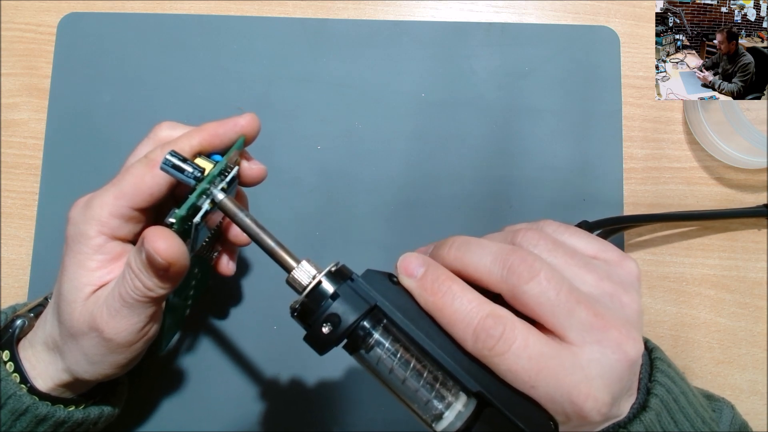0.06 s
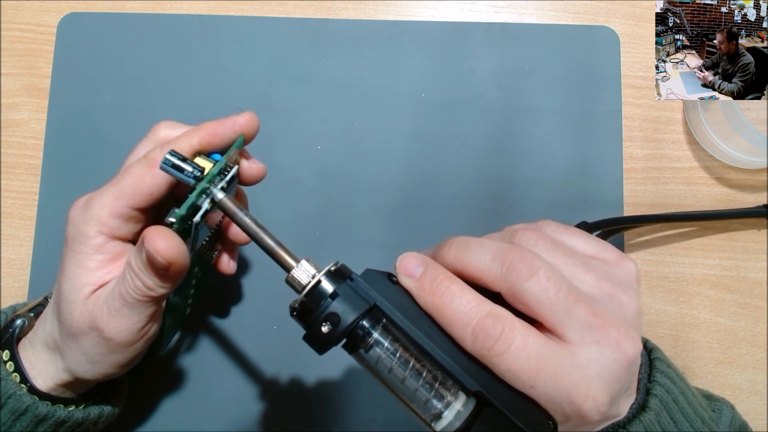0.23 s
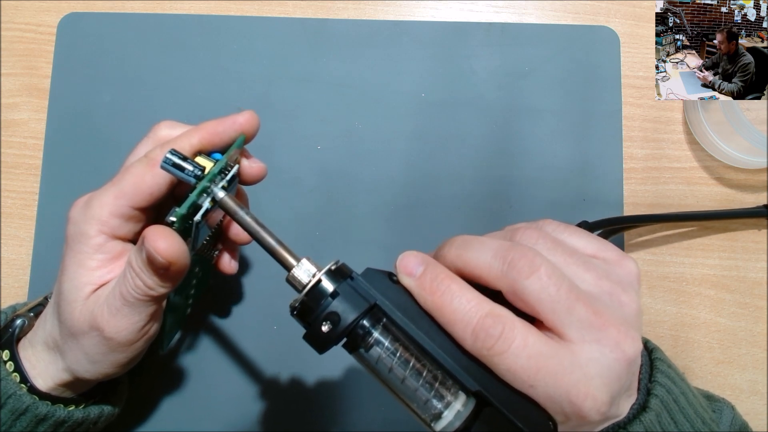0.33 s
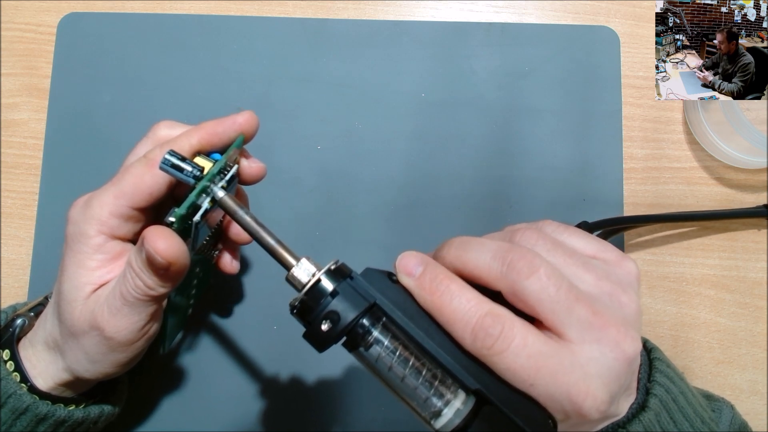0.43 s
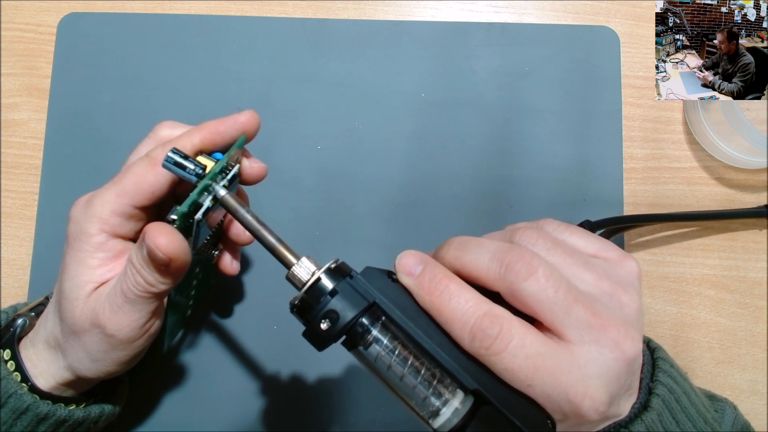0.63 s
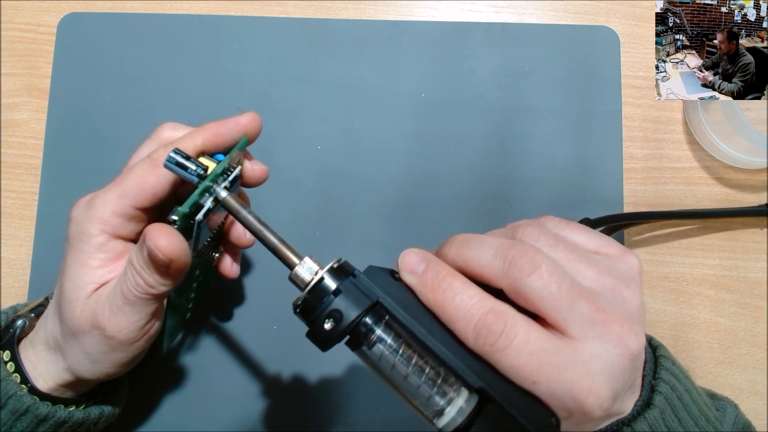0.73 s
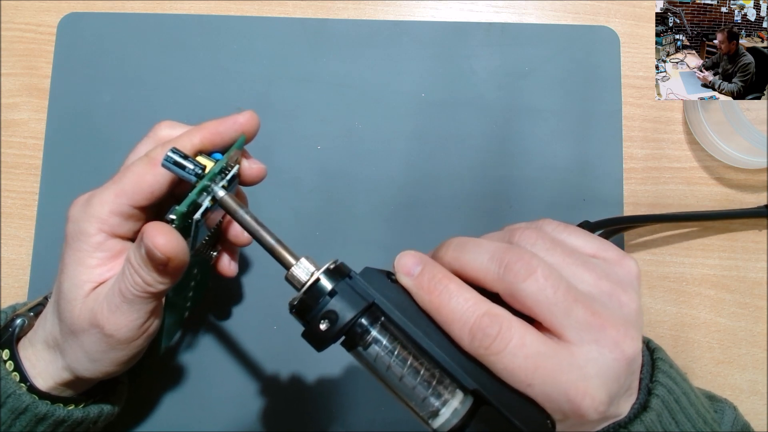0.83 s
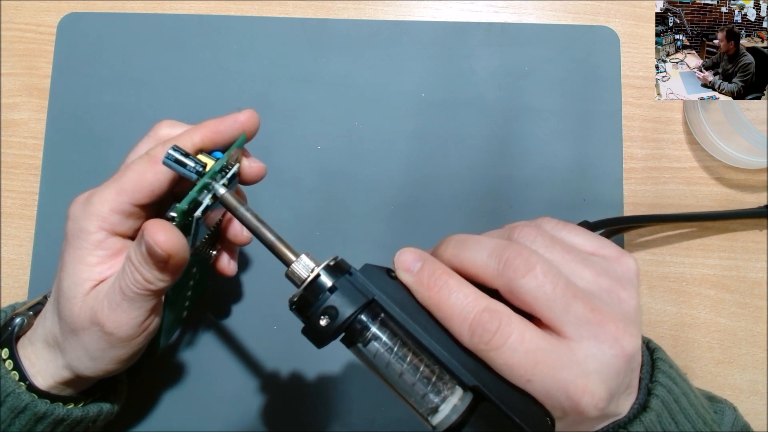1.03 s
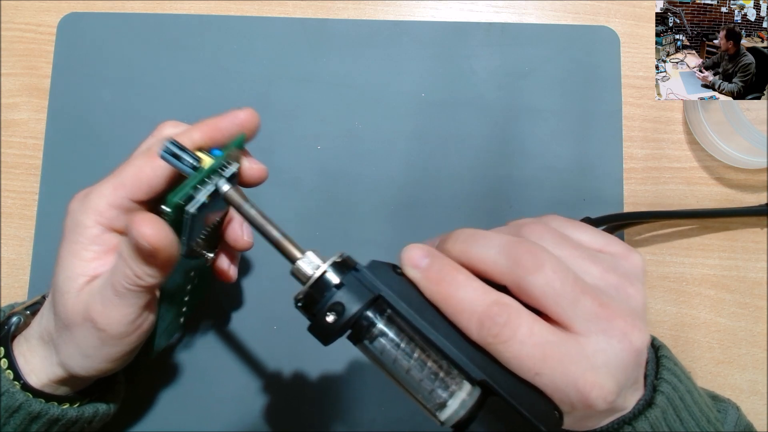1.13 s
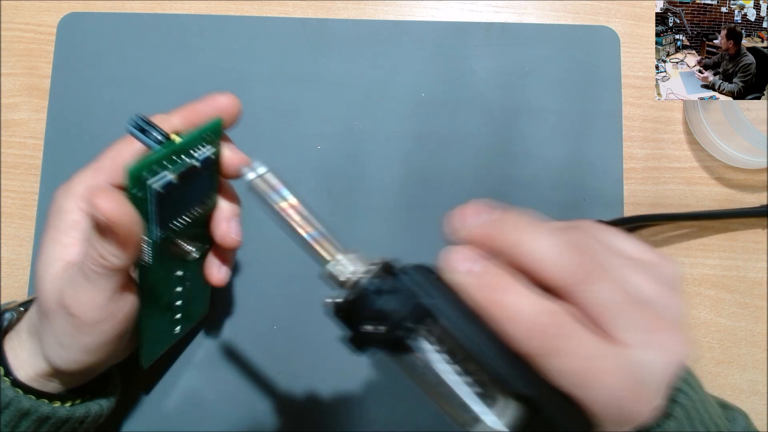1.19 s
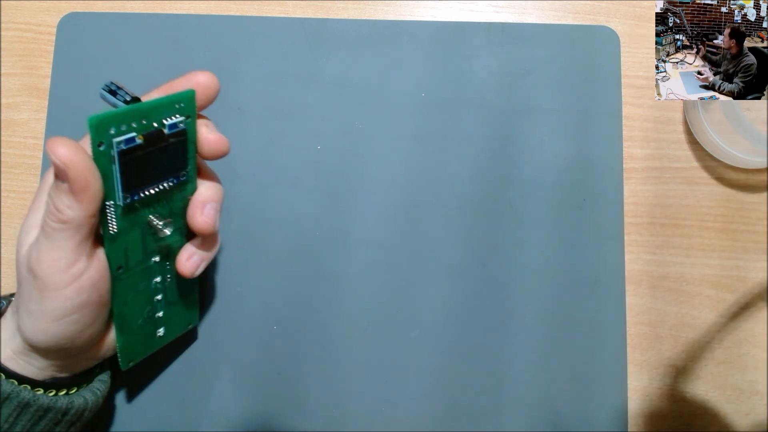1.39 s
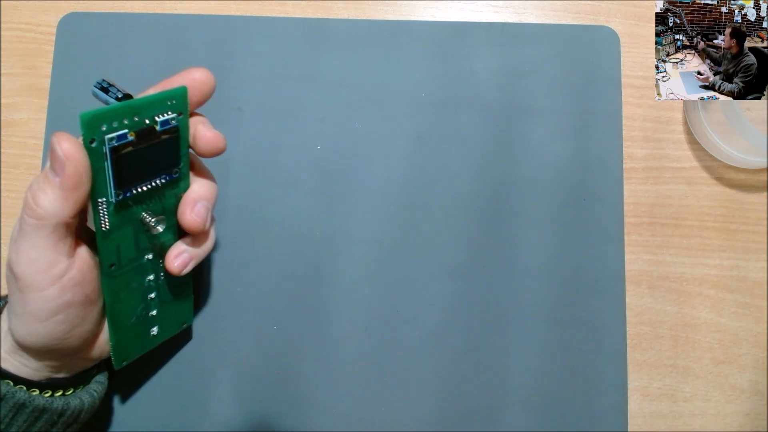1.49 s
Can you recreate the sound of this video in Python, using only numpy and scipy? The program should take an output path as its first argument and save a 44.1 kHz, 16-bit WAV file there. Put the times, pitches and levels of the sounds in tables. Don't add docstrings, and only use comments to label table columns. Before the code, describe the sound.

A hand-held desoldering gun at a workbench: trigger click, electric pump spins up quickly into a steady low buzz with faint air hiss, then a sharp trigger snap and falling motor, close mono microphone.

```python
import sys
import numpy as np
from scipy import signal
from scipy.fft import rfft, irfft, next_fast_len
from scipy.io import wavfile
from scipy.ndimage import uniform_filter1d

SR = 44100
rng = np.random.default_rng(int(sys.argv[2]) if len(sys.argv) > 2 else 0)


def transcribe(signal):
    frames = np.atleast_2d(signal).T
    limited = np.clip(frames, -1, 1)
    pcm = np.round(limited * 32767).astype(np.int16)
    wavfile.write(sys.argv[1], SR, pcm)


def rack_gain(trim_db):
    fader = np.asarray(trim_db, float)
    return 10 ** (fader / 20)


N = 68355
TIME = np.arange(N) / SR
FULL_HZ = 89

# start_s, ring_db, crack_db
PRESS_SNAPS = [
    (.2212, -8, -21),
    (.2236, -12, -23),
    (.2262, -13.5, -44),
    (.2295, -19, -46),
]


def evened(x):
    return x / np.sqrt(np.mean(x ** 2) + 1e-20)


def slow(size):
    once = uniform_filter1d(rng.standard_normal(N), size)
    return evened(uniform_filter1d(once, size))


def noise(colour, patch_db):
    frames, hz = N // 128 + 5, np.fft.rfftfreq(512, 1 / SR)
    real, imag, patch = rng.standard_normal((frames, 257, 3)).T
    patch = uniform_filter1d(uniform_filter1d(patch, size=6, axis=0), size=14, axis=1)
    colour_hz, colour_db = np.transpose(colour)
    level_db = np.interp(np.log(hz + 1), np.log(colour_hz + 1), colour_db)
    z = (real + 1j * imag) * rack_gain(level_db[:, None] + patch_db * evened(patch))
    return evened(signal.istft(z, nperseg=512, noverlap=384)[1][:N])


def shell(hz, peaks, flat):
    return flat + sum(rack_gain(db) / (1 + 1j * (hz - f * f / (hz + 1)) / w) for f, w, db in peaks)


def ring(force, peaks, flat):
    size = next_fast_len(N + SR)
    response = shell(np.fft.rfftfreq(size, 1 / SR), peaks, flat)
    return irfft(rfft(force, size) * response, size)[:N]


def pump():
    # start_s, shaft_hz, load_db, valve_knock_db, air_flow_db
    motor_course = [(.235, 45, -25, -3, -10), (.272, 63, -14, 7, -6), (.32, 74.5, -6, 0, -5),
                    (.345, 80.5, -4, -3, -3), (.39, 84.6, -3, -2, -2.5), (.48, 87, -.5, -7, -1.5),
                    (.535, 87.8, 0.1, -.5, 1.5), (.64, 88.3, 0.1, .3, 1.2), (.67, 88.5, -1.1, -1.5, -3),
                    (.76, 88.9, -.6, -1.5, -.3), (1.062, 89.9, 0.1, .3, 0.1), (1.07, 90.1, 0.1, .3, -18),
                    (1.082, 90.2, .3, 0, 3), (1.126, 90.3, 0.3, -1, 1.5), (1.152, 78, -13, 0, -6),
                    (1.19, 65, -11, -12, -15), (1.272, 43.5, -30, -1, -32), (1.385, 21, -42, -8, -40)]
    start_s, shaft_hz, load_db, knock_db, flow_db = np.transpose(motor_course)
    on = (TIME > start_s[0]) & (TIME < start_s[-1])
    speed = np.interp(TIME, start_s, shaft_hz)
    knock = rack_gain(np.interp(TIME, start_s, knock_db))
    load = np.interp(TIME, start_s, load_db)
    flow = np.interp(TIME, start_s, flow_db)
    strain = np.clip(1 - speed / FULL_HZ, 0, .3) / 0.294
    unsteady = 0.0007 * slow(size=300) + 0.0802 * strain * slow(size=250)
    turns = np.cumsum(speed * (1 + unsteady)) / SR
    fade = np.clip((TIME - start_s[0]) / 0.044, 0, 1) * np.clip((start_s[-1] - TIME) / 0.11, 0, 1)
    return (buzz(speed, turns, strain, knock, on * rack_gain(-23 + load)) + roar(strain, on * rack_gain(-25.5 + load))
            + bench_boom(speed, fade * strain) + nozzle_air(turns, on * rack_gain(-36.5 + flow)))


def buzz(speed, turns, strain, knock, level):
    # multiple, early_db (on reaching speed), late_db (once settled)
    order_levels = [(1, -20, -22), (2, 0, 0), (3, -9, -10), (4, -19, -21), (5, -19, -31), (6, -23, -25),
                    (7, -23, -22), (8, -15, -19), (9, -19, -30), (10, -1, -2), (11, -9, -8), (12, -28, -16),
                    (13, -24, -27), (14, -18, -21), (15, -26, -22), (16, -22, -23), (17, -33, -36),
                    (18, -23, -21), (19, -31, -32), (20, -31, -31), (21, -18, -12), (22, -24, -28),
                    (23, -24, -25), (24, -27, -21), (25, -24, -25), (26, -20, -26), (27, -29, -33),
                    (28, -28, -32), (29, -27, -29), (30, -31, -29), (31, -30, -25), (32, -31, -37),
                    (33, -36, -31), (34, -32, -33), (35, -38, -38), (36, -35, -34)]
    # pitch_hz, width_hz, level_db
    shell_peaks = [(176, 75, -3.5), (297, 32, -8), (930, 70, 13), (1906, 83, 9.5), (370, 130, -5.5)]
    settle_s = [.55, 1.0]
    orders, early_db, late_db = np.transpose(order_levels)
    early, late = rack_gain([early_db, late_db]) / abs(shell(orders * FULL_HZ, shell_peaks, 0.84))
    settled = np.interp(TIME, settle_s, [0, 1])
    strokes = np.zeros(N)
    for k in range(1, 50):
        place = k * speed / FULL_HZ
        level_early = np.interp(place, orders, early, right=0)
        level_late = np.interp(place, orders, late, right=0)
        strength = (1 - settled) * level_early + settled * level_late
        wobble = rack_gain(0.9 * (0.99 + (k / 18) ** 2 + strain) * slow(size=1800))
        valve = np.where((k * speed > 760) & (k * speed < 1120), knock, 1)
        phase = k * turns + rng.random() + 0.0012 * k * slow(size=400)
        strokes += strength * wobble * valve * np.cos(2 * np.pi * phase)
    gate = 1 + np.cos(4 * np.pi * turns)
    rattle = signal.lfilter([.07], [1, -.93], rng.standard_normal(N)) * gate * rack_gain(-43 + 16 * strain)
    return ring((strokes + rattle) * level, shell_peaks, 0.9)


def roar(strain, level):
    # pitch_hz, level_db per Hz
    roar_colour = [(40, -1.5), (220, -3.5), (380, -4.5), (650, -6.5), (1400, -10.5), (2300, -11),
                   (4000, -27.5)]
    return noise(roar_colour, patch_db=3.0) * np.sqrt(strain) * level


def bench_boom(speed, level):
    # multiple, level_db
    shake_levels = [(1, -47), (2, -41), (3, -48), (4, -55)]
    # pitch_hz, width_hz, level_db
    bench_peaks = [(130, 9, 17), (62, 12, 3)]
    turns = np.cumsum(speed) / SR
    shake = sum(rack_gain(db) * np.cos(2 * np.pi * k * turns) for k, db in shake_levels)
    return ring(level * shake, bench_peaks, 0)


def nozzle_air(turns, level):
    # pitch_hz, level_db per Hz
    air_colour = [(1200, -17.5), (2400, -17.5), (3400, -15), (5380, -22), (8660, -15), (10500, -17.5),
                  (14800, -18), (16000, -17)]
    # pitch_hz, width_hz, level_db
    nozzle_peaks = [(6030, 52, 3.5), (8500, 230, 1), (10000, 120, -1), (10970, 77, 7), (12100, 57, 2),
                    (14200, 74, 4)]
    hiss = evened(ring(noise(air_colour, patch_db=2.5), nozzle_peaks, 1))
    return hiss * (1 + 0.11 * np.cos(2 * np.pi * turns)) * level


def trigger(snaps, modes, colour):
    t, out, crack = np.arange(4000) / SR, np.zeros(N), noise(colour, patch_db=1.5)
    for start_s, ring_db, crack_db in snaps:
        i = round(start_s * SR)
        grip = np.zeros(len(t))
        for hz, db, t60 in modes:
            cycles = hz * rng.uniform(0.94, 1.03) * t + rng.random()
            grip += rack_gain(db - 60 * t / min(t60, .024)) * np.sin(2 * np.pi * cycles)
        burst = crack[i:i + 4000] * np.exp(-t / 0.0027)
        out[i:i + 4000] += np.minimum(t / 0.00061, 1) * (rack_gain(ring_db) * grip + rack_gain(crack_db) * burst)
    return out


def trigger_press():
    # pitch_hz, level_db, t60_s
    press_modes = [(1120, -22, 0.03), (3240, -10.5, 0.012), (4190, -13.5, 0.015), (6600, -17.5, 0.069),
                   (8240, -17.5, 0.039), (9700, -13, 0.014), (10270, -16.5, 0.096), (14600, -26, .02),
                   (12280, -17, 0.025)]
    # pitch_hz, level_db per Hz
    press_crack = [(530, -81), (900, -5.5), (2120, -13.5), (3260, -10), (5200, -12.5), (6330, -9),
                   (9770, -22), (16000, -13)]
    return trigger(PRESS_SNAPS, press_modes, press_crack)


def trigger_release():
    # start_s, ring_db, crack_db
    release_snaps = [
        (1.099, -30, -23),
        (1.1302, -16.5, -16),
        (1.1328, -16.5, -15.5),
        (1.1352, -31, -25),
    ]
    # pitch_hz, level_db, t60_s
    release_modes = [(960, -38, 0.1), (3460, 3, 0.0092), (4390, -2.5, 0.014), (5080, 1.5, 0.01),
                     (6560, -9, 0.03), (9400, -8, 0.049), (11460, -17, 0.042), (12700, -7, 0.028)]
    # pitch_hz, level_db per Hz
    release_crack = [(500, -14), (1000, 0.5), (2600, -4.5), (4250, -5), (5820, -20), (6720, 0.5),
                     (8250, -13), (16000, -6.5)]
    return trigger(release_snaps, release_modes, release_crack)


def spring():
    # pitch_hz, level_db per Hz
    spring_colour = [(1000, -10), (2500, 2.5), (5000, -17), (6500, 4.5), (10000, -0.5), (12500, -2),
                     (14000, -23), (16000, -20)]
    t = TIME - PRESS_SNAPS[0][0]
    return (t > 0) * rack_gain(-30.5) * np.exp(-abs(t) / 0.044) * noise(spring_colour, patch_db=-5.0)


def squeaks():
    # start_s, length_s, pitch_hz, level_db
    whistles = [(1.056, .034, 12150, -38), (1.054, .034, 14300, -32), (1.052, .03, 15200, -32),
                (1.083, .008, 11600, -33), (1.087, .008, 10500, -27), (1.09, .012, 14600, -33),
                (1.076, .014, 12300, -33), (1.094, .01, 8800, -33), (1.118, .009, 6850, -25),
                (1.122, .016, 6300, -30)]
    out = np.zeros(N)
    for start_s, length_s, hz, db in whistles:
        swell = np.sin(np.pi * np.clip((TIME - start_s) / length_s, 0, 1)) ** 2
        turns = np.cumsum(hz * (1 + .014 * slow(size=40))) / SR
        out += rack_gain(db) * swell * np.sin(2 * np.pi * turns)
    return out


def knocks():
    # start_s, pitch_hz, ring_db, t60_s, crack_db
    single_knocks = [(.262, 925, -31, 0.069, -60), (0.285, 972, -27.5, 0.15, -60),
                     (.313, 208.5, -15.5, 0.06, -39), (.333, 170, -19, 0.037, -50),
                     (0.332, 5830, -31, 0.019, -31), (.332, 3950, -30, 0.018, -60),
                     (0.348, 284, -28, 0.062, -50), (.363, 410, -22.5, 0.044, -49),
                     (0.914, 6000, -35.5, .02, -41), (1.192, 135.4, -22, 0.11, -60),
                     (1.152, 235, -23, 0.039, -60), (1.159, 5330, -27.5, .025, -41),
                     (1.162, 2560, -27, 0.021, -60), (1.168, 3910, -31, 0.038, -46),
                     (1.174, 245, -22.5, 0.044, -49), (1.191, 960, -33, 0.061, -45),
                     (1.207, 960, -29.5, 0.045, -41), (1.224, 960, -35.5, 0.12, -45),
                     (1.257, 940, -39, 0.094, -58), (1.277, 950, -42.5, 0.093, -52),
                     (1.3748, 9630, -39.5, 0.016, -40.5), (1.377, 1730, -43, .05, -47),
                     (1.4218, 1730, -38.5, 0.062, -46), (1.449, 10440, -44, 0.018, -50),
                     (1.466, 2040, -41, 0.057, -62), (1.475, 3820, -47, .05, -65),
                     (1.49, 1730, -43, 0.035, -55), (1.514, 4700, -45, 0.02, -57),
                     (1.517, 1450, -44.5, 0.12, -64)]
    # pitch_hz, level_db per Hz
    grit_colour = [(500, -33), (1500, 5), (5000, 3.5), (10000, 0), (16000, -8)]
    t, out, grit = np.arange(4000) / SR, np.zeros(N + 4000), noise(grit_colour, patch_db=6.0)
    for start_s, hz, ring_db, t60, crack_db in single_knocks:
        i = round(start_s * SR)
        rise = np.minimum(t * hz / 0.56, 1)
        out[i:i + 4000] += rise * rack_gain(ring_db - 60 * t / t60) * np.sin(2 * np.pi * hz * t)
        out[i:i + 4000] += rack_gain(crack_db) * np.exp(-t / 0.0026) * np.resize(grit[i:], len(t))
    return out[:N]


def hands():
    # start_s, length_s, level_db
    rustles = [
        (1.136, 0.067, -34.5),
        (1.36, 0.13, -46),
        (1.415, 0.016, -49),
        (1.431, 0.042, -51.5),
        (1.46, 0.039, -52),
    ]
    # pitch_hz, level_db per Hz
    cloth_colour = [(20, -1), (90, -11), (250, -5), (500, -13), (1000, -14), (2200, -17.5), (5000, -23),
                    (16000, -36)]
    # pitch_hz, level_db per Hz
    scuff_colour = [(300, -27), (900, 5.5), (1750, 4.5), (2800, -1), (5000, -11.5), (8000, -2.5),
                    (16000, -15)]
    sleeve = rack_gain(-47 + slow(size=900)) * np.clip((TIME - 1.07) / 0.034, 0, 1)
    strokes = np.zeros(N)
    for start_s, length_s, db in rustles:
        strokes += rack_gain(db) * np.sin(np.pi * np.clip((TIME - start_s) / length_s, 0, 1) ** .5)
    fingers = strokes * rack_gain(1.1 * slow(size=30)) * noise(scuff_colour, patch_db=4.5)
    rub = sleeve * noise(cloth_colour, patch_db=3.5) + fingers
    hush_db = -20 * np.exp(-((TIME - 1.412) / .005) ** 2)
    dull = signal.filtfilt(*signal.butter(4, 2200, fs=SR), rub)
    return dull + rack_gain(hush_db) * (rub - dull)


def walls(x):
    taps = np.zeros(SR // 2)
    at = np.arange(200, len(taps) - 20, 20)
    taps[at + rng.integers(0, 20, len(at))] = rng.choice([-1., 1.], len(at))
    hz, t, z = signal.stft(taps, SR, nperseg=256)
    t60 = np.interp(np.log(hz + 1), np.log([300, 8000]), [.4, .15])[:, None]
    tail = signal.istft(z * rack_gain(-60 * t / t60), SR, nperseg=256)[1]
    return signal.fftconvolve(x, tail / np.linalg.norm(tail))[:N]


def workshop():
    # pitch_hz, level_db per Hz
    room_colour = [(20, -5), (120, -22), (210, 1.5), (380, -11), (520, -10), (950, -6), (1400, -14.5),
                   (16000, -36.5)]
    # pitch_hz, level_db (peak lies 9 dB higher)
    fan_lines = [(209.9, -77.5), (349.9, -74.5), (683.7, -70), (985.1, -72.5), (1556, -72), (1943, -80.5),
                 (2336, -78.5)]
    fan = np.zeros(N)
    for hz, db in fan_lines:
        fan += rack_gain(db + 9 + slow(size=1500)) * np.sin(2 * np.pi * (hz * TIME + rng.random()))
    return rack_gain(-59) * noise(room_colour, patch_db=2.5) + fan


def scene():
    snaps = trigger_press() + trigger_release() + squeaks() + knocks() + spring()
    mix = pump() + snaps + rack_gain(-13) * walls(snaps) + hands() + workshop()
    return np.array([mix, mix])


def top_cut(x):
    return signal.sosfilt(signal.butter(12, 16810, fs=SR, output="sos"), x)


def record(dry):
    edge = signal.firwin(511, 15800, window=("kaiser", 9), fs=SR)
    mix = signal.oaconvolve(dry, edge[None], "same")
    return top_cut(mix)


dry = scene()
out = record(dry)
transcribe(out)
```